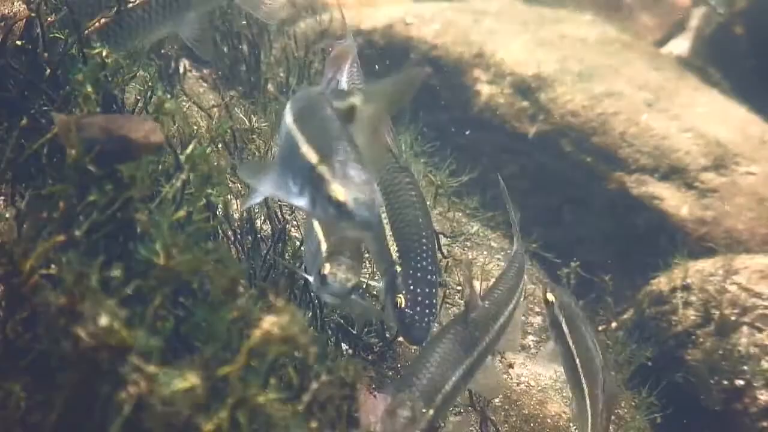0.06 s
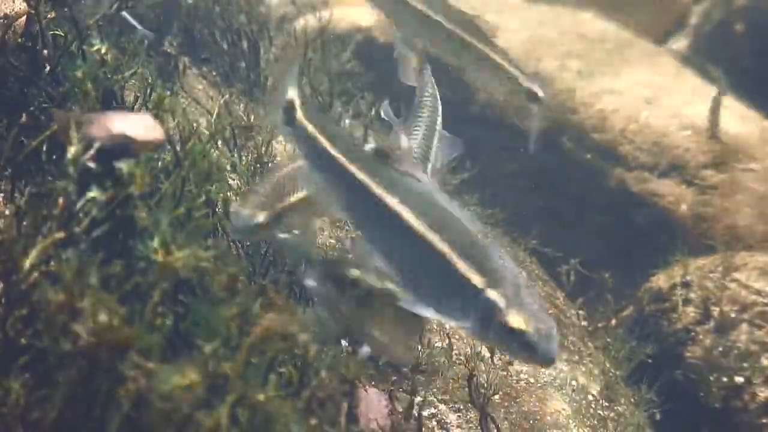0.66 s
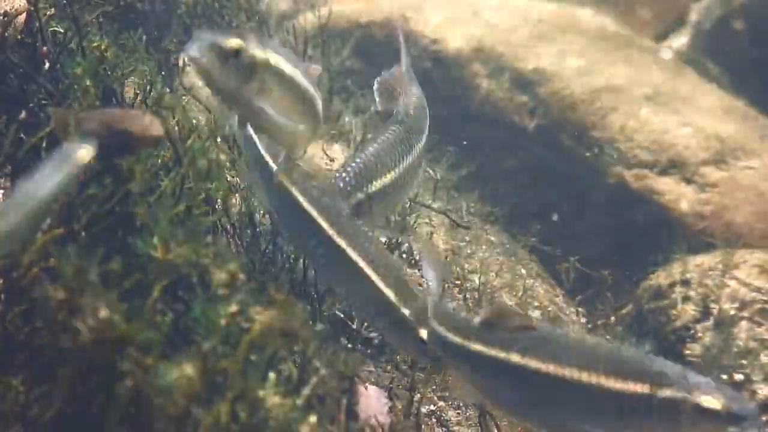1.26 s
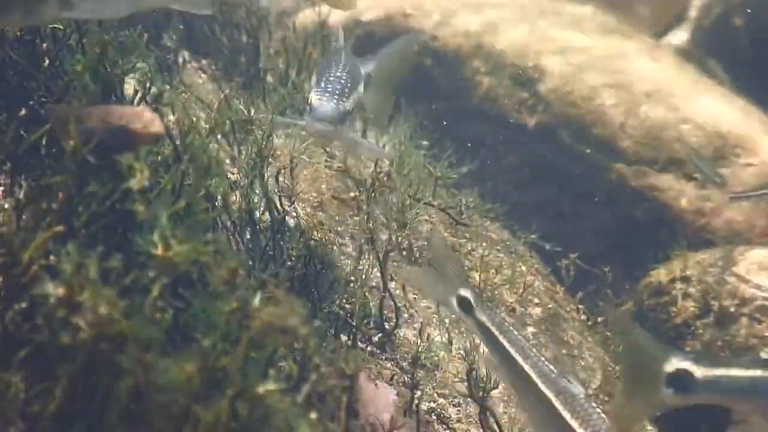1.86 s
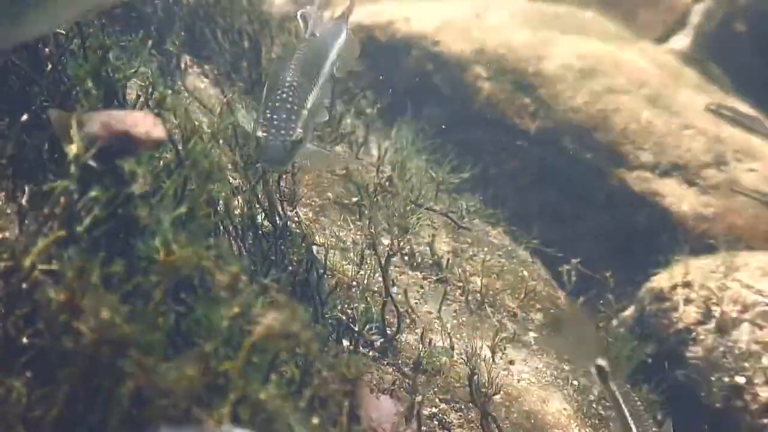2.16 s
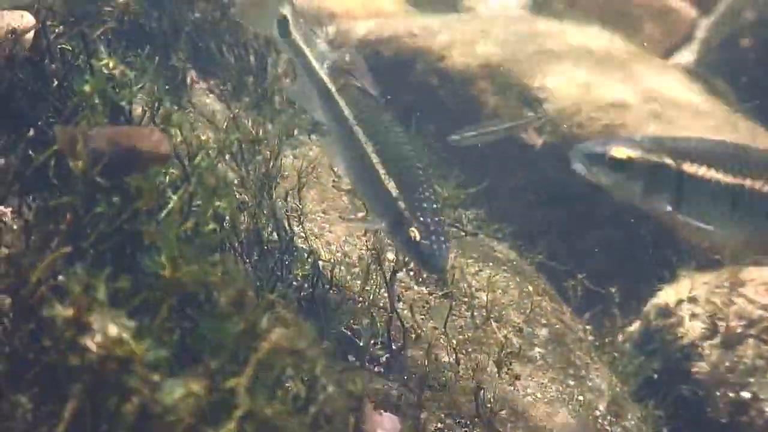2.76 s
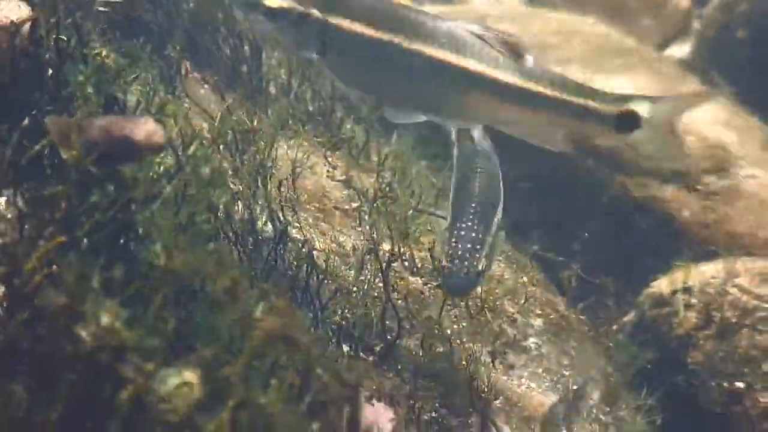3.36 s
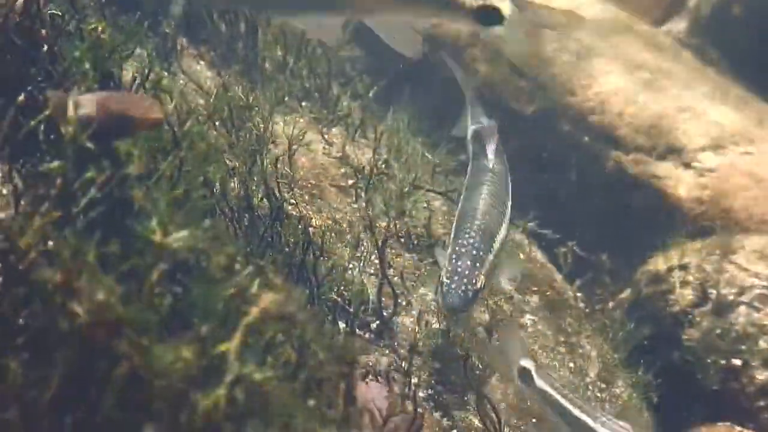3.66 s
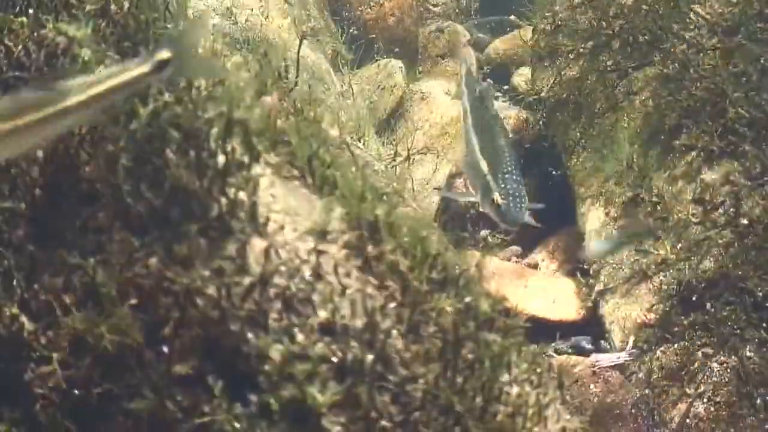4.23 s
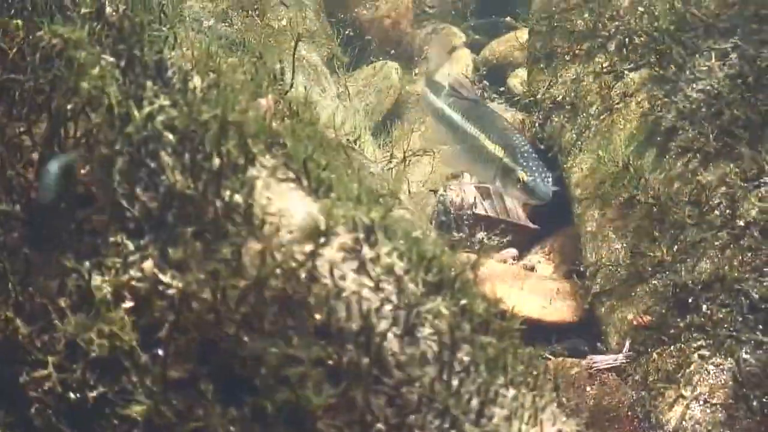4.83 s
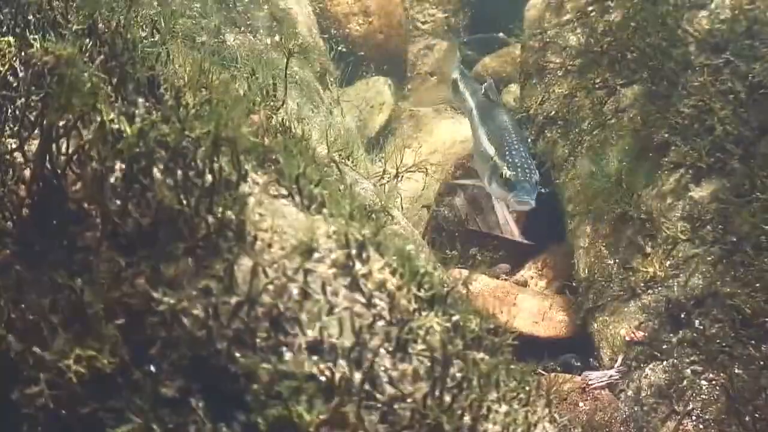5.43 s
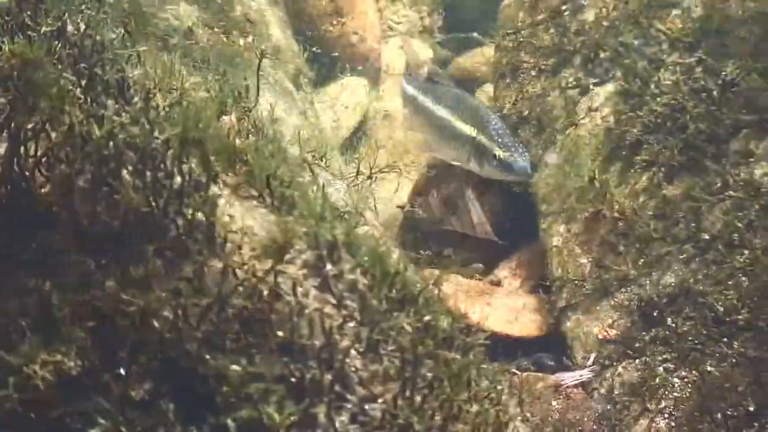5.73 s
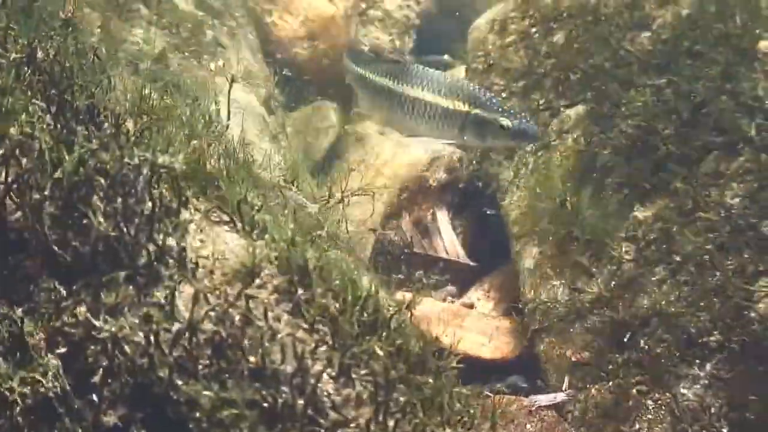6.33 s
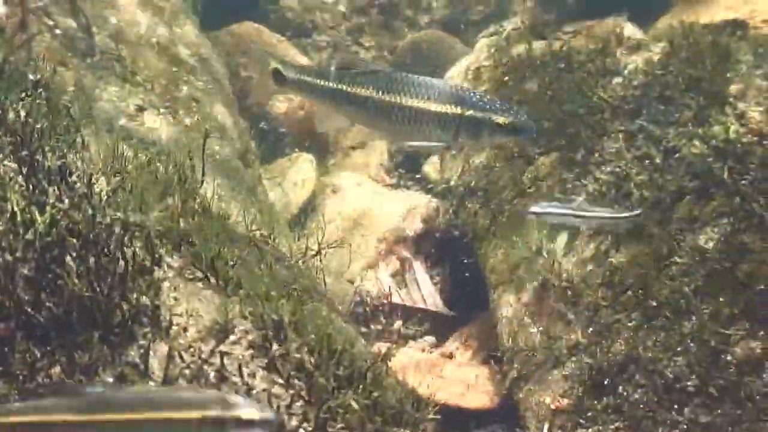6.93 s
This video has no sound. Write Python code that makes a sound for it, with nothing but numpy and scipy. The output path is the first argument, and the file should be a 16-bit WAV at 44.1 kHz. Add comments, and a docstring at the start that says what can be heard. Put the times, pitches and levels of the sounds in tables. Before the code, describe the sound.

Quiet underwater river sound: a soft, steady hiss dotted with small high bubble pings, plus a faint buzz and whine from the camera. After a couple of light scrapes, grains tick and drag right against the microphone's case for about a second. A single hard stone clack follows, the loudest moment. Then only the flow and bubbles remain, with a few light ticks and dull bumps near the end.

```python
"""A camera in a waterproof housing lies on a shallow river bed among feeding fish.
From the start the current hisses, small bubbles ping, and the electronics whine and buzz once per picture.
After a stray scrape or two, grit clicks, patters and drags on the housing from about 2.6 s.
At 4.4 s a stone clacks close by. Then the bubbles carry on over the hiss and buzz,
with a few last clicks near 6 s and soft bumps at the end."""
import sys
import numpy as np
from scipy import signal
from scipy.fft import rfft, irfft
from scipy.io import wavfile
from scipy.ndimage import uniform_filter1d

SR = 44100
rng = np.random.default_rng(int(sys.argv[2]) if len(sys.argv) > 2 else 0)


def materialize(psi):
    """Save the field psi as 16-bit PCM at rate SR to the path in sys.argv[1].

    A 1-D psi becomes a single channel; in a 2-D psi each row is a channel.
    """
    bounded = np.clip(np.atleast_2d(psi).T, -1, 1)
    quanta = np.round(bounded * 32767).astype(np.int16)
    wavfile.write(sys.argv[1], SR, quanta)


N = 317120

# modes of the water-damped housing: (pitch [Hz], relative level [dB], t60 [s])
HOUSING_MODES = [(302.5, -33.5, 0.17), (724, -16.5, 0.021), (1020, -9.5, 0.029), (1253, -4.5, 0.025),
                 (1486, -7, 0.035), (1837, -1, 0.026), (2147, -1.5, 0.026), (2500, -2, 0.024),
                 (2810, 2, 0.038), (3160, 2.5, 0.0097), (3630, -1, 0.013), (4373, -8.5, 0.031),
                 (4700, -11, 0.014), (7400, -20.5, 0.01)]
def housing_ring(scatter_db, rise_s, detune=0.035):
    """Each blow lands on a new spot, which shifts the strength and, slightly, the pitch of every mode."""
    out = np.zeros(int(2 * SR * max(t60 for _, _, t60 in HOUSING_MODES)))
    for k, (hz, db, t60) in enumerate(HOUSING_MODES):
        strong, sharp = rng.standard_normal(2)
        mode = ping(hz * (1 + detune * sharp), t60, rise_s)
        out[:len(mode)] += (-1) ** k * undb(db + scatter_db * strong) * mode
    return out


def grain(db, hz, t60, housing_db):
    """A grain gives a short contact ping and sets the housing ringing."""
    click = peak(housing_ring(scatter_db=0.5, rise_s=0.000067), housing_db)
    contact = peak(ping(hz, t60, rise_s=0.00021), 0)[:len(click)]
    click[:len(contact)] += contact
    return peak(click, db)


# grain hits: (time [s], peak [dB], contact pitch [Hz], contact t60 [s], housing against contact [dB])
GRAIN_HITS = [(2.609, -11, 2030, 0.0073, -5.5), (2.627, -23, 1960, .008, 11), (2.7716, -8, 3540, .02, 3.5),
              (2.7786, -8, 3550, .029, 7.5), (2.786, -13.5, 2920, .022, 2), (2.8138, -25, 3300, .008, 5),
              (2.826, -25, 3070, .02, 2), (2.8997, -27.5, 3840, .012, 12), (3.0469, -12, 2840, 0.03, -1.5),
              (3.1846, -21.5, 2760, .05, 1), (3.2154, -16, 2320, 0.0043, 7), (3.2199, -16, 2760, 0.014, -8),
              (3.2394, -29, 3050, .014, 2), (3.335, -24.5, 2890, .025, -1), (3.5253, -24, 2880, .014, 3),
              (3.592, -17.5, 2730, 0.036, -9), (3.6618, -16.5, 2850, 0.0064, -7),
              (3.688, -25, 3040, .006, -5), (3.7033, -16.5, 3040, .005, -11), (3.7322, -14, 2800, .01, 3),
              (3.74, -12, 2550, .013, -19), (3.8706, -15, 3050, 0.0034, -20),
              (4.3448, -25.5, 2870, .016, 2), (6.1162, -21, 3250, .007, -7),
              (6.1795, -28, 3380, 0.0053, -7), (6.1835, -20.5, 3310, 0.0065, -5)]
def grit_clicks(rebounds=2, gap_s=0.009, rebound_db=-22):
    """Grains strike the housing and bounce, each rebound much weaker than the last."""
    out = np.zeros(N)
    for s, db, hz, t60, housing_db in GRAIN_HITS:
        add(out, s, grain(db, hz, t60, housing_db))
        for k in range(1, rebounds + 1):
            s += gap_s * np.exp(0.25 * rng.standard_normal())
            add(out, s, grain(db + k * rebound_db, hz, t60=0.0082, housing_db=3))
    return out


# modes of the stone: (pitch [Hz], relative level [dB], t60 [s])
STONE_MODES = [(467, -17, 0.018), (683, -17.5, 0.031), (794, -11.5, 0.024), (1210, -6.5, 0.01),
               (1366, -9, 0.02), (1920, -15.5, 0.02), (2116, -7, 0.015), (2560, 1.5, 0.0052),
               (2930, -1, 0.011), (3310, -7.5, 0.011), (3730, -10, 0.009), (4520, -13.5, 0.013),
               (6300, -26, 0.011)]
def stone_clack(at_s=4.39, rise_cycles=0.81, snap_t60=0.0035):
    """One hard blow, choked by the water: a bright snap, then a body whose low modes bloom later."""
    body = np.zeros(N)
    for hz, db, t60 in STONE_MODES:
        add(body, at_s, undb(db) * ping(hz, t60, rise_cycles / hz))
    body_eq = [(200, -10), (350, -10.5), (560, 2.5), (4800, 2.5),
               (5500, -9), (6300, -0.5), (9000, -25), (15000, -24)]
    out = peak(colour(body, body_eq), db=-0.5)
    t = np.arange(SR // 100) / SR
    snap = np.diff(rng.standard_normal(len(t) + 1)) * undb(-60 * t / snap_t60)
    add(out, at_s, peak(snap, db=-22))
    return out


# grit dragging over the housing: (time [s], length [s], rms level [dB])
GRIT_DRAGS = [(0.024, 0.036, -45), (2.078, 0.049, -42.5), (2.787, 0.052, -40.5), (2.94, 0.077, -46.5),
              (3.216, 0.048, -46), (3.415, 0.023, -41.5), (3.531, 0.061, -33), (3.591, 0.033, -35),
              (3.632, .095, -44), (3.727, 0.022, -25.5), (4.33, .012, -41), (4.555, 0.025, -46.5)]
def grit_scrapes(grains=3, slips_per_s=800, attack_s=0.0054, release_s=0.0072):
    """Several grains slip at once, each ringing its own spot on the housing; the drag swells and dies."""
    out = np.zeros(N)
    drag_eq = [(600, 6.5), (1200, -2.5), (1900, -5.5), (2900, -1.0), (3700, 1.5), (4500, -4.5)]
    for s, length, db in GRIT_DRAGS:
        n = int(length * SR)
        t = np.arange(n) / SR
        pressure = np.minimum(t / attack_s, 1) * np.minimum((length - t) / release_s, 1)
        drag = 0
        for _ in range(grains):
            size = rng.standard_normal(SR // 8)[:n]
            slipping = rng.random(SR // 8)[:n] < slips_per_s / SR
            ring = housing_ring(scatter_db=-0.5, rise_s=0.00012)
            drag = drag + signal.fftconvolve(size * slipping * pressure, ring)
        drag = colour(drag, drag_eq)
        add(out, s, drag * undb(db) / np.sqrt(np.mean(drag[:n] ** 2)))
    return out


def grit_patter(from_s=3.07, to_s=3.72, count=14, db=-34, spread_db=2.5, hz=2990, octaves=0.08):
    """While the bed is stirred, loose grains land on the housing in an uneven rhythm."""
    out = np.zeros(N)
    for k, (late, strong, sharp) in enumerate(rng.standard_normal((count, 3))):
        s = from_s + (to_s - from_s) * (k + 0.5 + 0.35 * late) / count
        add(out, s, grain(db + spread_db * strong, hz * 2 ** (octaves * sharp), t60=0.02, housing_db=-2))
    return out


# pushes on the housing: (time [s], peak [dB], pitch [Hz], t60 [s])
SOFT_PUSHES = [(2.393, -39.5, 644, .021), (2.629, -38, 295, 0.11), (2.632, -36, 487, .023),
               (4.078, -41, 412, 0.049), (4.43, -35.5, 523, 0.017), (4.573, -39.5, 550, .052),
               (4.617, -36.5, 162, 0.017), (7.1318, -32, 400, 0.0093), (7.156, -31.5, 680, 0.0056),
               (7.16, -34.5, 135, 0.047)]
def bumps():
    """A soft push on the housing sounds just one low, dull note."""
    out = np.zeros(N)
    for s, db, hz, t60 in SOFT_PUSHES:
        add(out, s, peak(ping(hz, t60, rise_s=0.00038), db))
    return out


def bubble(hz, db, cycles=42):
    """A bubble swells and rings for a set number of cycles, so large ones last longer; its pitch sags."""
    return peak(ping(hz, cycles / hz, rise_s=7.5 / hz, glide=-0.042), db)


# foreground bubbles: (time [s], peak [dB], pitch [Hz])
NEAR_BUBBLES = [(.054, -32, 2570), (.363, -43, 1400), (.416, -34, 3730), (0.518, -33.5, 1885),
                (.531, -34.5, 3380), (.635, -33, 3460), (.853, -35, 4430), (1.147, -40, 3520),
                (1.27, -43, 1486), (1.562, -36.5, 2900), (1.618, -36.5, 3010), (1.630, -39.5, 2030),
                (1.665, -34.5, 4340), (1.689, -40, 1490), (1.71, -32.5, 2980), (2.073, -34.5, 1625),
                (2.158, -37.5, 2040), (2.273, -35.5, 2620), (3.802, -33, 3180), (4.226, -37, 1980),
                (4.570, -35, 2500), (4.841, -34.5, 2860), (4.942, -37, 3380), (5.036, -36.5, 1700),
                (5.670, -38.5, 3470), (5.753, -30.5, 3480), (5.921, -39, 2670), (5.944, -37.5, 2020),
                (6.076, -30.5, 2050), (6.553, -37, 3520)]
def near_bubbles(splinters=3, splinter_db=-12, spread_s=0.006, octaves=0.21):
    """Each near bubble breaks off in a tight cluster of weaker splinters."""
    out = np.zeros(N)
    for s, db, hz in NEAR_BUBBLES:
        add(out, s, bubble(hz, db))
        for late, sharp in rng.standard_normal((splinters, 2)):
            add(out, s + spread_s * late, bubble(hz * 2 ** (octaves * sharp), db + splinter_db))
    return out


# swarms: (rate [bubbles/s], base peak [dB], centre pitch [Hz], pitch spread [octaves])
BUBBLE_SWARMS = [(69.6, -49, 3500, 0.311), (4.97, -44, 3400, 0.19), (1.6, -47.5, 2050, .15)]
def fizz(pool=1000, nearness_db=2.0, ceiling_db=-40.5):
    """A bed of tiny distant bubbles, with a few nearer ones and now and then a large one."""
    out = np.zeros(N)
    for per_s, db, hz, octaves in BUBBLE_SWARMS:
        draws = np.column_stack([rng.random(pool), rng.exponential(size=pool), rng.standard_normal(pool)])
        for when, nearness, sharp in draws[:int(per_s * N / SR)]:
            pitch = min(hz * 2 ** (octaves * sharp), 5600)
            peak_db = min(db + nearness_db * nearness, ceiling_db)
            add(out, when * N / SR, bubble(pitch, peak_db, cycles=35.6))
    return out


# tone of the flow: (frequency [Hz], relative level [dB])
CURRENT_EQ = [(30, -90), (450, -88), (1100, -93), (1600, -93), (2050, -88), (2330, -97.5), (2800, -90.5),
              (3080, -92.5), (3500, -90), (4200, -99), (6500, -102), (9500, -106), (15000, -105)]
def current(waver_db=1.0):
    """The flow hisses through the housing's resonances and wavers a little."""
    hiss = level(colour(rng.standard_normal(N), CURRENT_EQ), db=-53)
    return hiss * undb(waver_db * drift(hz=6))


PICTURE_HZ = 59.94
# tick trains within a burst: (delay [s], rate [ticks/s], ticks [count], strength [relative])
BURST_TICKS = [(0, 804, 8, 1), (.0031, 390, 3, .7)]
# tone of the ticks: (frequency [Hz], relative level [dB])
TICK_EQ = [(60, -15), (400, -10), (800, -4.5), (1150, 5), (1600, -0.5), (2400, -2), (3200, 0), (4000, 1),
           (4800, -4.5), (5700, -2), (7300, -9.5), (9700, -19.5), (13300, -8.5), (15500, -13.5)]
def electronics_buzz(first_s=0.00995, burst_s=0.0095, jitter_s=0.00001, unevenness=0.34):
    """The electronics work in one burst per picture: sharp ticks over gated noise."""
    ticks, taps = np.zeros(N), np.arange(-8, 9)
    bursts = np.arange(first_s, N / SR, 1 / PICTURE_HZ)[:, None]
    for delay, rate, count, size in BURST_TICKS:
        times = (bursts + delay + np.arange(count) / rate).ravel()
        late, strong = rng.standard_normal((2, len(times), 1))
        position = (times[:, None] + jitter_s * late) * SR
        index = position.astype(int) + taps
        impulse = np.sinc(index - position) * np.hanning(len(taps))  # lands between samples
        np.add.at(ticks, index % N, -size * (1 + unevenness * strong) * impulse)
    gate = (np.arange(N) / SR - first_s) % (1 / PICTURE_HZ) < burst_s
    rasp_eq = [(200, -17.5), (1500, -2.0), (3600, -1.0), (6000, -5), (9500, -23.5)]
    rasp = colour(gate * rng.standard_normal(N), rasp_eq)
    return level(colour(ticks, TICK_EQ), db=-52.5) + level(rasp, db=-58)


def coil_whine(hz=8571.4, wander_rad=0.15):
    """A coil sings thinly at a constant level; its pitch wobbles once every two pictures."""
    t = np.arange(N) / SR
    wobble = np.sin(np.pi * PICTURE_HZ * t)
    return level(np.sin(2 * np.pi * hz * t + wobble + wander_rad * drift(hz=130)), db=-60.5)


def ping(hz, t60, rise_s, glide=0):
    """One dying vibration; glide is the relative change of pitch over t60."""
    t = np.arange(int(1.2 * t60 * SR)) / SR
    tone = np.sin(2 * np.pi * hz * t * (1 + glide * t / t60 / 2))
    return tone * undb(-60 * t / t60) * (1 - np.exp(-t / rise_s))


def colour(x, points):
    """Minimum-phase EQ through (frequency [Hz], gain [dB]) points."""
    hz, db = np.transpose(points)
    log_hz = np.log(np.fft.rfftfreq(4096, 1 / SR) + 1)
    cepstrum = irfft(np.log(undb(np.interp(log_hz, np.log(hz), db))))
    half = len(cepstrum) // 2
    cepstrum[1:half] *= 2
    cepstrum[half + 1:] = 0
    return signal.fftconvolve(x, irfft(np.exp(rfft(cepstrum))))[:len(x)]


def drift(hz):
    """Smooth random modulation with a spread of 1."""
    hold = int(SR / hz)
    steps = np.repeat(rng.standard_normal(N // hold + 1), hold)
    smooth = uniform_filter1d(uniform_filter1d(steps, hold), hold)[:N]
    return smooth / smooth.std()


def undb(db):
    """Decibels to gain."""
    return 10 ** (np.asarray(db) / 20)


def level(x, db):
    """Scale to an rms level."""
    return x * undb(db) / np.sqrt(np.mean(x ** 2))


def peak(x, db):
    """Scale to a peak level."""
    return x * undb(db) / np.abs(x).max()


def add(out, s, x):
    """Mix x into out from time s."""
    i = min(max(int(s * SR), 0), N)
    out[i:i + len(x)] += x[:N - i]


def scene():
    """Everything reaches one microphone inside the housing."""
    water = current() + near_bubbles() + fizz()
    contacts = grit_clicks() + grit_patter() + grit_scrapes() + stone_clack() + bumps()
    return (water + contacts + electronics_buzz() + coil_whine())[None]


def record(dry, ceiling=1.2, top_hz=15650):
    """The camera soft-clips the loudest peak and cuts the top end."""
    rounded = dry / (1 + np.abs(dry / ceiling) ** 4) ** (1 / 4)
    return signal.sosfilt(signal.ellip(10, 0.1, 70, top_hz, fs=SR, output="sos"), rounded)


dry = scene()
out = record(dry)
materialize(out)
```